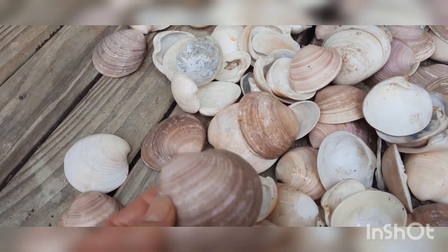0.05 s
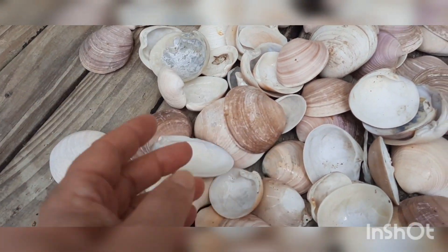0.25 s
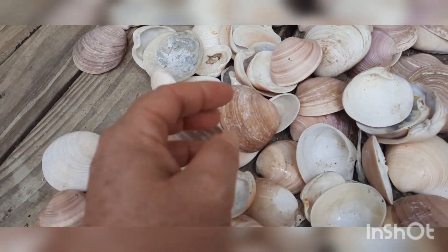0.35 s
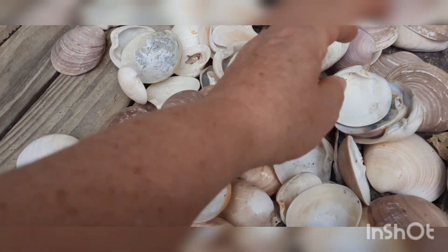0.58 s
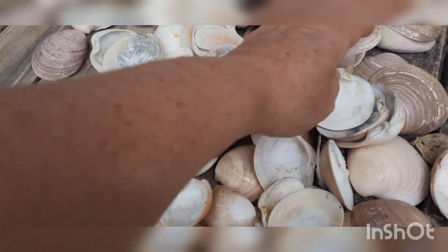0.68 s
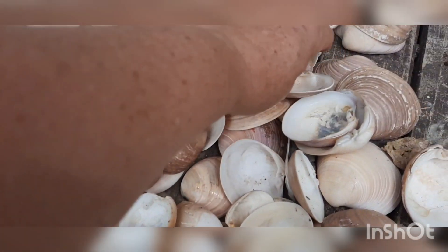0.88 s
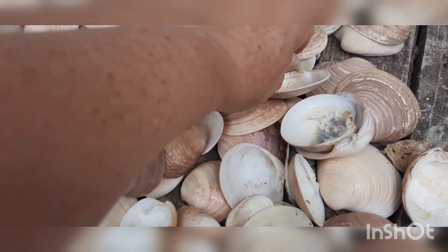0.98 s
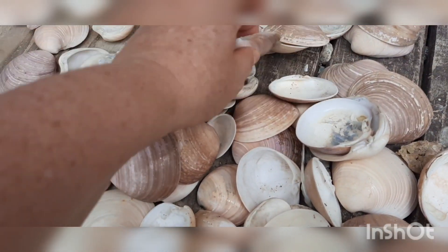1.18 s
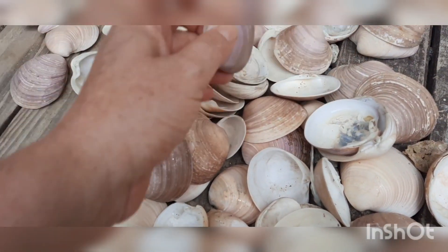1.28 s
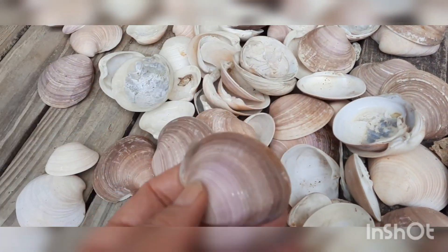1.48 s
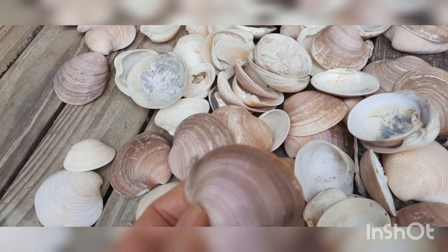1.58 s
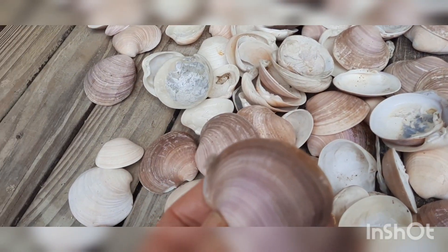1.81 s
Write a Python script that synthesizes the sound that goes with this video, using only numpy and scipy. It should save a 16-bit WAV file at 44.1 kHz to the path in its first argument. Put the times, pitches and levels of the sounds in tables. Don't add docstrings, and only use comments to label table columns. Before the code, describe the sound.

A seashell lands on a wooden deck and bounces twice with hollow knocks, smaller shells tap, then fingers rake the pile in a bright clatter, ending almost silent; close handheld phone, outdoors.

```python
import sys
import numpy as np
from scipy import signal
from scipy.fft import rfft, irfft
from scipy.io import wavfile
from scipy.ndimage import uniform_filter1d

SR = 44100
rng = np.random.default_rng(int(sys.argv[2]) if len(sys.argv) > 2 else 0)


def voltage_ratio(level):
    return 10 ** (np.asarray(level, float) / 20)


def int16_out(signal):
    q = np.round(np.clip(np.atleast_2d(signal).T, -1, 1) * 32767)
    wavfile.write(sys.argv[1], SR, q.astype(np.int16))


N = 81585
LONG = 8192
SHELL_LOW_HZ = 257

# (frequency [Hz], bandwidth [Hz], level [dB])
PILE = [(1470, 100, -3.5), (3840, 89, -12), (4620, 130, -0.5), (5440, 60, -6), (6230, 89, -13.5),
        (8420, 90, -4), (10600, 83, -9.5), (13000, 100, -20.5)]
# (frequency [Hz], level [dB], decay time t60 [s])
BOARD = [(318, 0, .11), (380, -11, .06), (660, -17, .04)]


def unit(x):
    return x / np.sqrt(np.mean(x ** 2) + 1e-18)


def colour(x, table, scale=1):
    hz, db = np.array(table, float).T[:2]
    n = x.shape[-1]
    f = np.maximum(np.arange(n // 2 + 1) * SR / n, 1)
    gain = voltage_ratio(scale * np.interp(np.log(f), np.log(hz), db))
    return irfft(rfft(x) * gain, n)


def tilt(x, db):
    return colour(x, [(375, -3 * db), (24000, 3 * db)])


def low_cut(x):
    return signal.sosfilt(signal.butter(2, SHELL_LOW_HZ, "high", fs=SR, output="sos"), x)


def curve(table, axis):
    rows = np.array(table, float)
    return np.interp(np.arange(N) / SR, rows[:, 0], rows[:, axis])


def pair(n, like):
    mid, side = rng.standard_normal((2, n))
    like = np.clip(like, 0, 1)
    opposed = side * np.array([[1], [-1]])
    return np.sqrt((1 + like) / 2) * mid + np.sqrt((1 - like) / 2) * opposed


def ring(modes, scatter_db, spread):
    hz, db, t60 = np.array(modes, float).T[:, :, None]
    level, detune, phase, balance = rng.standard_normal((4, len(modes), 1))
    t = np.arange(LONG) / SR
    env = voltage_ratio(db + scatter_db * level - 60 * t / np.clip(t60, .003, .11))
    angle = 2 * np.pi * hz * (1 + .004 * detune) * t
    ports = []
    for side in (1, -1):
        partials = env * voltage_ratio(side * 2 * balance) * np.sin(angle + side * spread * phase)
        ports.append(partials.sum(0))
    return np.array(ports)


def add(out, s, sound, db):
    i = int(s * SR)
    n = min(sound.shape[1], N - i)
    out[:, i:i + n] += sound[:, :n] * voltage_ratio(db) / np.abs(sound).mean(0).max()


def background():
    # (time [s], hum level [dB], air level [dB])
    gate = [(0, -43.5, -77), (.2, -44.5, -84), (.3, -38, -59.5), (.62, -44.5, -61.5), (.73, -41.5, -80),
            (.9, -56, -54.5), (1.1, -43, -70), (1.4, -68.5, -63), (1.55, -68, -90), (1.64, -76, -93.5),
            (1.72, -67.5, -78.5), (1.85, -67, -83.5)]
    # (frequency [Hz], density [dB per Hz])
    air_spectrum = [(15, -52.5), (45, -19), (102, -20), (200, -32.5), (450, -25.5), (1330, -35.5),
                    (2800, -37.5), (7500, -38), (9200, -41), (10500, -49.5)]
    hum_hz, hum_width_hz, hum_db, air_db = 96, 16, -10, 13.5
    f = np.arange(N // 2 + 1) * SR / N
    resonance = (1 + ((f - hum_hz) / hum_width_hz) ** 2) ** 1.3
    hum = unit(irfft(rfft(pair(N, .8)) / resonance, N))
    air = unit(colour(pair(N, 0.28), air_spectrum))
    return hum * voltage_ratio(curve(gate, axis=1) + hum_db) + air * voltage_ratio(curve(gate, axis=2) + air_db)


def bumps():
    # (time [s], peak level [dB])
    thuds = [
        (0.249, -23.5),
        (0.939, -31),
        (1.131, -26.5),
        (1.187, -34.5),
        (1.24, -34.5),
        (1.304, -15.5),
    ]
    bump_hz, bump_t60_s, left_db = 66, 0.059, -14
    out, t = np.zeros((2, N)), np.arange(LONG) / SR
    glide = .007 * (1 - np.exp(-t / .007))
    thud = np.sin(2 * np.pi * bump_hz * (t + glide)) * voltage_ratio(-60 * t / bump_t60_s)
    thud = signal.sosfilt(signal.butter(2, 45, "high", fs=SR, output="sos"), thud)
    for s, db in thuds:
        add(out, s, thud * np.array([[-voltage_ratio(left_db)], [1]]), db)
    return out


def board():
    # (time [s], peak level [dB])
    pushes = [(0.249, -13.5), (0.28, -16.5), (0.311, -15.5), (0.392, -17), (0.418, -20.5), (0.543, -29),
              (0.657, -32.5), (0.776, -44.5), (0.937, -27.5), (0.959, -30), (1.134, -33.5), (1.265, -31),
              (1.306, -16), (1.35, -34)]
    out = np.zeros((2, N))
    for s, db in pushes:
        add(out, s, signal.fftconvolve(ring(BOARD, 2, .35), np.hanning(40)[None]), db + 0.5)
    return low_cut(out)


def drag(slides, lean_db, board_db):
    # (frequency [Hz], level [dB])
    scrape = [(260, -23.5), (600, -4), (3200, -10.5), (6000, -7.5), (8500, -20.5), (9590, -17),
              (15600, -21), (16300, -50)]
    out, t = np.zeros((2, N)), np.arange(LONG) / SR
    hold = int(SR / 250)
    for s, length, db, swell_db, hz in slides:
        chance, size, sign = rng.random((3, LONG))
        steps = np.repeat(rng.standard_normal(LONG // hold + 1), hold)
        grip = voltage_ratio(2.5 * uniform_filter1d(steps, size=90)[:LONG])
        env = voltage_ratio(swell_db * t / length) * np.clip(np.minimum(t, length - t) / .004, 0, 1)
        strength = np.cos(np.pi * sign) * voltage_ratio(-1.8 * np.log(size + 1e-3))
        slips = ((chance < .15) * strength * grip * env)[None]

        modes = [(f, d - 10, 1.3 / w) for f, w, d in PILE]
        modes += [(hz, -4, .02), (hz * 1.03, -6, .02), (BOARD[0][0], board_db, .1)]
        tones = unit(signal.fftconvolve(ring(modes, 2, 1.1), slips))
        grain = voltage_ratio(-60 * t / 0.0061) * pair(LONG, 0.22)
        grit = unit(colour(signal.fftconvolve(grain, slips, axes=1)[:, :-1], scrape))
        sound = unit(tilt(voltage_ratio(-0.5) * tones[:, :-1] + grit, lean_db))
        sound = sound * np.sqrt(2 * LONG / SR / length)
        i = int(s * SR)
        out[:, i:i + LONG] += sound[:, :LONG] * voltage_ratio(db)
    return out


def scuffs():
    # (start [s], length [s], level [dB], swell over the length [dB], ring frequency [Hz])
    rubs = [
        (.762, .036, -51, -8, 1000),
        (.80, .068, -58, 5, 1260),
        (.6, .05, -61, 0, 1500),
        (.657, .045, -58, -12, 1500),
        (1.39, .096, -68, -20, 600),
    ]
    return drag(rubs, -7.5, -19)


def dragged_pile():
    # (start [s], length [s], level [dB], swell over the length [dB], ring frequency [Hz])
    pulls = [
        (.869, .094, -33.5, 2.5, 8450),
        (.99, 0.087, -46.5, -0.5, 5560),
        (1.072, 0.061, -41, -8.5, 5127),
        (1.17, 0.066, -45.5, 0, 6230),
        (1.238, .055, -50.5, -4, 6140),
        (1.305, 0.083, -44.5, -14, 5460),
    ]
    return drag(pulls, 1.0, -12.5)


def chatter(length_s):
    t = np.arange(1300) / SR
    chance, sign = rng.random((2, 1300))
    fade = np.exp(-(t / max(length_s, .0003)) ** 2 / 2)
    slips = (chance < .05) * np.cos(np.pi * sign) * fade
    return .55 * slips + (t == 0)


def clinks(hits, shell, shell_db, crack_db, t60, trim_db):
    # (frequency [Hz], level [dB])
    crack_spectrum = [(150, -24.5), (250, 4.5), (1660, 0), (3290, -2), (5660, 6), (10000, -8.5),
                      (15500, -12.5), (16800, -29.5)]
    out, t = np.zeros((2, N)), np.arange(LONG) / SR
    t60 = min(t60, .026)
    for s, db, hz, ms, lean_db in hits:
        close_modes = [(hz, -2, t60), (hz * 1.04, -5, t60), (hz * .95, -8, t60)]
        body = min(hz / 3000, 1) * ring(close_modes, 0, 1.4)
        body = body + voltage_ratio(shell_db) * ring(shell, 2.5, 1.4)
        decay = voltage_ratio(-60 * t / .018) + voltage_ratio(-12 - 60 * t / .06)
        crack = unit(colour(pair(LONG, .4), crack_spectrum)) * decay
        contact = chatter(ms * 0.0009)[None]
        sound = signal.fftconvolve(body + voltage_ratio(crack_db) * crack, contact)
        sound = tilt(np.roll(sound, 64, axis=1), lean_db)
        add(out, s - .001, sound, db + trim_db)
    return out


def lifted_shell():
    # (time [s], peak level [dB], ring frequency [Hz], chatter [ms], tilt [dB per octave])
    contacts = [
        (1.1312, -5.5, 8590, 2, 0.6),
        (1.3018, -5.5, 6600, 2.5, 0.6),
        (1.3138, -3.5, 8610, 3, 3),
        (1.321, -12, 5345, 1.8, 0.3),
        (1.3575, -12, 8190, 2.6, 0.6),
        (1.379, -20, 5570, 2.6, -1.4),
    ]
    # (frequency [Hz], level [dB], decay time t60 [s])
    held_shell = [(3570, -9, .08), (4650, -14, .04), (5340, -5, .07), (5500, -6, .08), (8135, -7, .045),
                  (8608, 0, .042), (11500, -13, .025), (13100, -18, .02)]
    return clinks(contacts, held_shell, 1.7, -1.0, .02, -1.5)


def clatter():
    # (time [s], peak level [dB], ring frequency [Hz], chatter [ms], tilt [dB per octave])
    contacts = [(0.8673, -9.5, 6600, 2.5, 2.1), (0.877, -15.5, 8400, 2, 0.6), (0.888, -11.5, 4200, 2, 0.3),
                (0.9415, -14.5, 8780, 3, 0.37), (0.959, -22, 8500, 2, -0.33),
                (0.988, -5.5, 5950, 1.5, -0.21), (1.003, -14.5, 5000, 1, 0.59),
                (1.0165, -10, 6020, 5, -0.25), (1.027, -23, 7000, 1, 0.8), (1.0509, -21, 6320, 2.5, -1.6),
                (1.0705, -13.5, 10600, 2, 0.6), (1.0735, -6.5, 4620, 4, 0.88), (1.081, -9.5, 5000, 3, 0.6),
                (1.091, -14.5, 6600, 3, -0.44), (1.116, -16, 5220, 2, 0.055), (1.156, -24, 5390, 1.8, 1.1),
                (1.1645, -5, 4050, 1.2, 2.5), (1.173, -7, 6230, 3, 2.2), (1.188, -11, 1500, 2.5, 0.56),
                (1.195, -11.5, 8000, 2.5, 0.6), (1.2015, -10.5, 8190, 3, 1.6),
                (1.228, -18.5, 4250, 2.5, 0.3), (1.2358, -6.5, 8140, 2.5, 2.7),
                (1.238, -10, 5370, 2.5, 2.4), (1.263, -21, 10600, 2, 0.83), (1.2742, -15.5, 10600, 1.8, 1),
                (1.28, -21.5, 1900, 1.8, -0.3), (1.344, -15.5, 2360, 4, -0.15), (1.364, -14, 1430, 4, -1.2)]
    pile_modes = [(f, db, 0.91 / width) for f, width, db in PILE]
    return clinks(contacts, pile_modes, -3.0, -3.9, 0.075, -1.6)


def knocks():
    # (time [s], peak level [dB], ring frequency [Hz], chatter [ms], tilt [dB per octave])
    contacts = [(0.5312, -8, 8220, 2.5, -0.1), (0.5431, -3.5, 2400, 4, 2.2), (0.6005, -31, 1640, 5, -2.5),
                (0.6544, -11.5, 1910, 1.5, -3), (0.668, -27, 1800, 4, -4), (0.6868, -21, 4920, 2.5, -2.7),
                (0.7771, -33, 1000, 2.6, -9), (0.8001, -30.5, 1420, 3, -3.5), (0.8255, -24.5, 8450, 4, 0.8),
                (0.8435, -25, 5020, 2.5, -3), (1.4181, -35, 7740, 3, -1), (1.542, -56.5, 8170, 5, 4)]
    # (frequency [Hz], level [dB], decay time t60 [s])
    small_shell = [(1800, -9, 0.016), (2375, -1, 0.034), (2640, -12, 0.095), (3960, -2.5, .06),
                   (4750, 2.5, .048), (5800, -1, .027), (10000, -10.5, 0.04), (10380, -2.5, 0.019),
                   (13300, -10.5, 0.047)]
    return clinks(contacts, small_shell, -6, 1.8, 0.047, -2.4)


def dropped_shell():
    # (time [s], peak level [dB], ring frequency [Hz], chatter [ms], tilt [dB per octave])
    contacts = [
        (0.2473, -1, 1630, 4.9, 1.54),
        (0.2787, 0.5, 1765, 1.6, -1.9),
        (0.3112, -5, 5060, 5.3, 2),
        (0.338, -22, 5330, 4.2, -6),
        (0.3915, -1, 1616, 2.8, -1),
        (0.4204, -6.5, 3850, 0.59, -0.6),
        (0.4245, -4, 5110, 2.4, 3.8),
        (0.4295, -12.5, 5050, 2, -4.6),
    ]
    # (frequency [Hz], level [dB], decay time t60 [s])
    big_shell = [(1570, -6, .03), (1688, -6, .055), (1825, -8, .04), (2200, -9, .025), (2500, -11, .025),
                 (2810, -15, .04), (3300, -12, .03), (3840, -7, .085), (4035, -8, .07), (4500, -14, .03),
                 (5100, -9, .045), (6830, -12, .03), (8820, -13, .022), (9480, -14, .03)]
    return clinks(contacts, big_shell, 0.82, 2.0, 0.048, -3.3)


def deck_scatter(near):
    # (frequency [Hz], level [dB])
    deck = [(300, -1.5), (6000, -4), (10000, -9.5), (15500, -2), (16100, -43.5)]
    deck_t60_s, deck_db, likeness = .13, -11, .4
    t = np.arange(LONG) / SR
    tail = colour(pair(LONG, likeness), deck) * voltage_ratio(-60 * t / deck_t60_s) * (t > .003)
    tail = tail / np.sqrt((tail ** 2).sum(1).mean())
    return voltage_ratio(deck_db) * signal.fftconvolve(near.mean(0)[None], tail)[:, :N]


def at_ports(shells):
    # (frequency [Hz], left minus right [dB])
    ports = [(60, -8), (110, 1), (200, -5.5), (380, 6), (700, -4.5), (1290, 7), (2380, 14), (4400, -7),
             (8120, -18.5), (15000, -1)]
    return np.array([colour(shells[0], ports, 0.32), colour(shells[1], ports, -0.2)])


def scene():
    near = dropped_shell() + knocks() + clatter() + lifted_shell() + dragged_pile() + scuffs()
    near = low_cut(near)
    shells = near + deck_scatter(near)
    return at_ports(shells) + board() + bumps() + background()


def roll_off(x):
    return signal.sosfilt(signal.butter(12, 17000, fs=SR, output="sos"), x)


def record(dry):
    # (frequency [Hz], level [dB])
    treble_end = [(15700, 0), (16300, -14), (17000, -30)]
    mix = np.clip(colour(dry, treble_end), -1, 1)
    return roll_off(mix)


dry = scene()
out = record(dry)
int16_out(out)
```